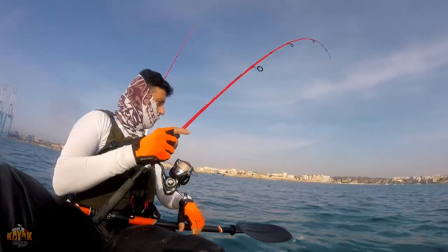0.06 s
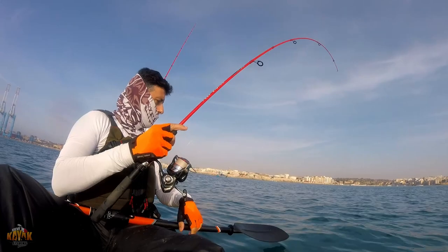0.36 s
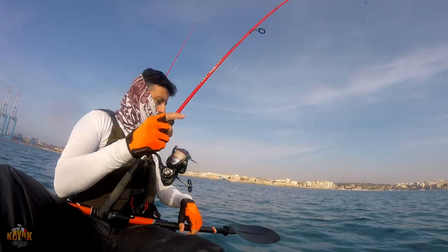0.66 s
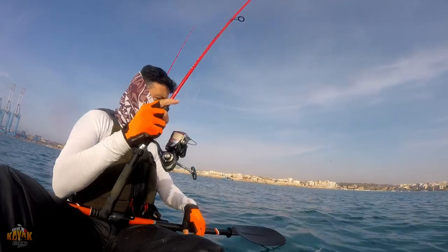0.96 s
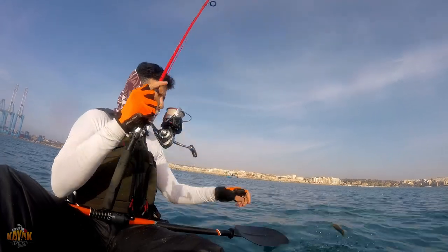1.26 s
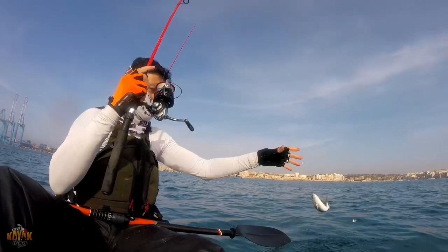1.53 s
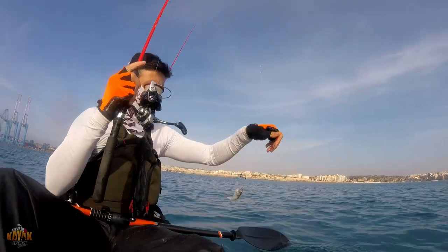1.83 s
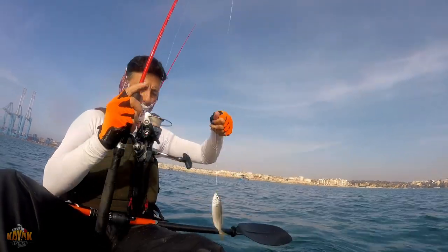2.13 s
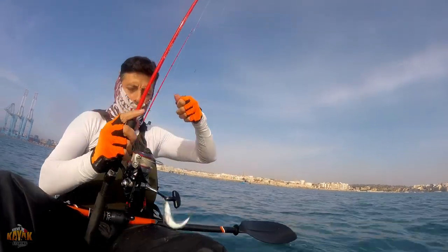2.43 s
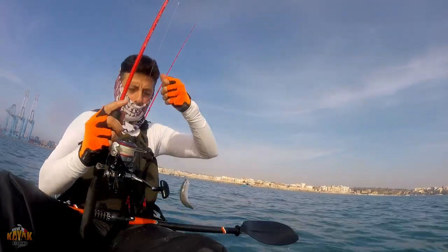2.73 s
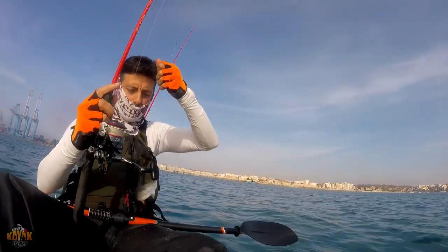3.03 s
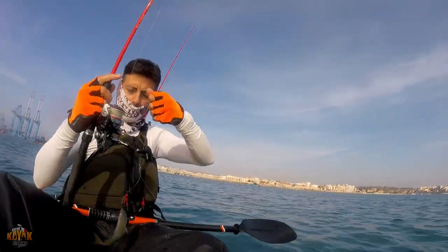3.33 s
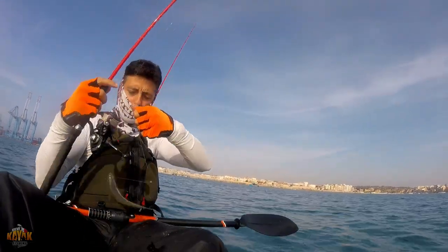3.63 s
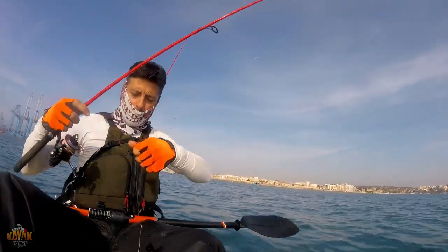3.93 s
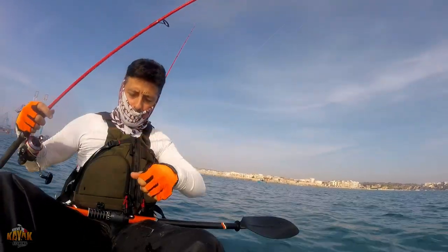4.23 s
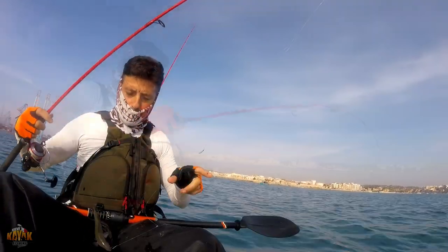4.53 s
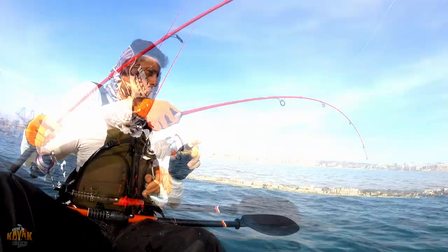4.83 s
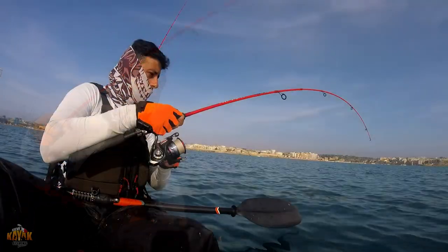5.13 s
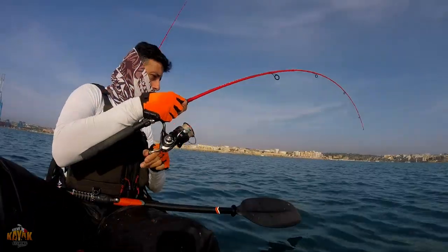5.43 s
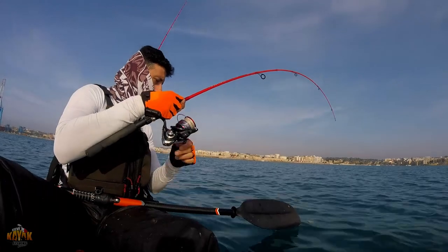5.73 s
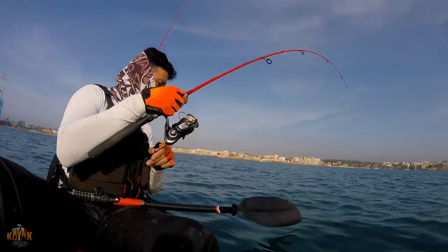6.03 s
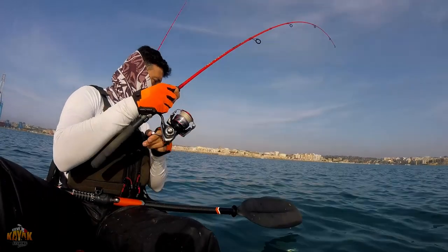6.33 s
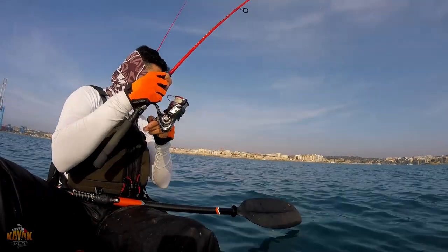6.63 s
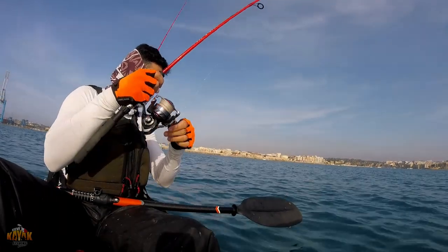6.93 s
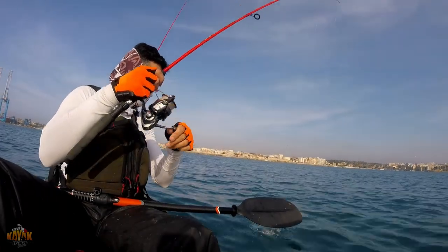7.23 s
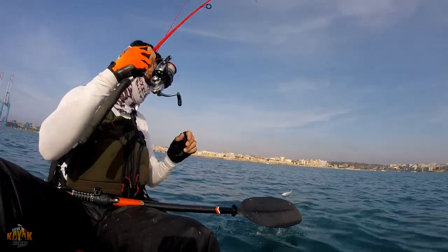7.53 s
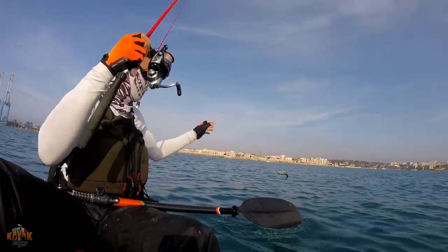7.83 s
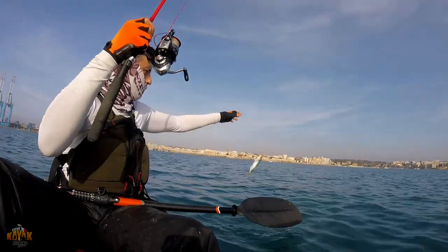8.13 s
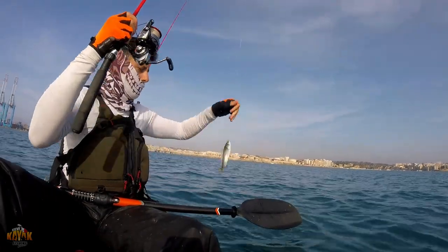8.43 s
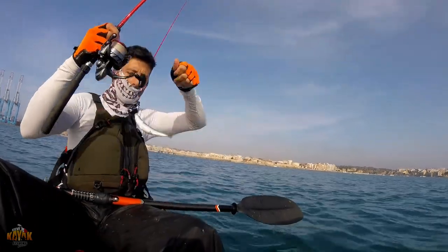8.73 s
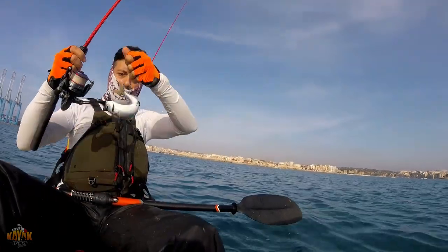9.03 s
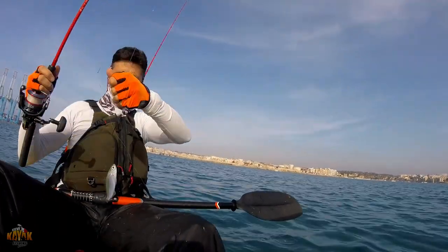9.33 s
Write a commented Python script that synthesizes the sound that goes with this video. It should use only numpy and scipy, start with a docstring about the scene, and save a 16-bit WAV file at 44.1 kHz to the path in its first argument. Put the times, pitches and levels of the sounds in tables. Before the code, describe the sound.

Wind buffets the microphone while small waves slap a hollow plastic kayak on open sea. A reel ticks faintly and a fish splashes lightly, then tackle clacks, clothing rustles and the rod butt and catch knock on the boat as gusts build. After a brief dropout, the wind fades and a second fish thrashes at the surface. The breeze returns under a last flurry of loud knocks and clacks. Everything is close, without echo.

```python
"""Fishing from a plastic kayak on open sea. Wind buffets the microphone, small waves slap the hollow
hull, the reel ticks and clothing rustles. A fish splashes as it is lifted out; tackle clacks, and the rod
butt and swinging catch knock on the boat while the breeze builds. Halfway, the sound drops out briefly.
The wind dies down as a second fish is reeled in and thrashes at the surface, then returns under a last
flurry of knocks and clacks."""
import sys
import numpy as np
from scipy import signal
from scipy.fft import rfft, irfft
from scipy.io import wavfile
from scipy.ndimage import uniform_filter1d

SR = 44100
rng = np.random.default_rng(int(sys.argv[2]) if len(sys.argv) > 2 else 0)


def inscribe(sig):
    """Save sig as 16-bit PCM at rate SR to the path in sys.argv[1].

    A 1-D sig is mono; a 2-D sig holds one channel per row.
    Samples are clipped to [-1, 1] before scaling.
    """
    pcm = np.round(np.clip(np.atleast_2d(sig).T, -1, 1) * 32767)
    wavfile.write(sys.argv[1], SR, pcm.astype(np.int16))


N = 421596
TIME = np.arange(N) / SR


def amp(db):
    """Decibels to gain."""
    return 10 ** (np.asarray(db) / 20)


def unit(x):
    """Scales to rms 1."""
    return x / np.sqrt(np.mean(x ** 2) + 1e-20)


def unit_peak(x, size=130):
    """Scales the loudest three milliseconds to rms 1."""
    return x / np.sqrt(uniform_filter1d(x ** 2, size).max() + 1e-20)


def add(mix, start_s, sound):
    """Mixes a sound in at a time."""
    part = mix[max(round(start_s * SR), 0):][:len(sound)]
    part += sound[:len(part)]


def colour(eq, hz):
    """Gain of a (freq_hz, gain_db) EQ curve at the given frequencies."""
    freq_hz, gain_db = np.transpose(eq)
    return amp(np.interp(np.log(hz + 1), np.log(freq_hz), gain_db))


def shape(x, eq, size=4096):
    """Minimum-phase EQ: a blow never sounds before it lands."""
    log_gain = np.log(colour(eq, abs(np.fft.fftfreq(size, 1 / SR))))
    response = np.fft.ifft(np.exp(np.conj(signal.hilbert(log_gain)))).real
    return signal.oaconvolve(x, response[:size // 2])[:len(x)]


def noise(eq, patchy_db, size=1024):
    """Coloured noise with drifting patches in time and frequency."""
    hz, hop = np.fft.rfftfreq(size, 1 / SR), size // 4
    real, imag, patches = rng.standard_normal((3, N // hop + 5, len(hz)))
    patches = unit(uniform_filter1d(uniform_filter1d(patches, size=7, axis=0), size=12, axis=1))
    spectrum = (real + 1j * imag) * colour(eq, hz) * amp(patchy_db * patches)
    return unit(signal.istft(spectrum.T, nperseg=size, noverlap=size - hop)[1][:N])


def burst(t, t60):
    """Noise that starts at once and dies away."""
    return rng.standard_normal(len(t)) * np.exp(-np.log(1000) * t / t60)


def attack(t, rise_s):
    """A quick fade-in that rounds off an onset."""
    return 1 - np.exp(-t / rise_s)


def ring(modes, t, scatter_db, detune):
    """Damped modes; the place of the blow changes their strength and pitch a little."""
    hz, db, t60 = np.transpose(modes)[:, :, None]
    strength, shift = rng.standard_normal((2, len(modes), 1))
    waves = np.sin(2 * np.pi * hz * (1 + detune * shift) * t) * np.exp(-np.log(1000) * t / t60)
    return (amp(db + scatter_db * strength) * waves).sum(0)


def curve(points):
    """Joins (time_s, value) points by straight lines over the whole scene."""
    return np.interp(TIME, *np.transpose(points))


def surges(events, rise_s, t60):
    """Envelope of (peak_s, level_db) events that each build up quickly and die away."""
    power = np.zeros(N)
    for peak_s, db in events:
        age = TIME - peak_s
        fade_in = np.clip(1 + age / rise_s, 0, 1)
        power += (amp(db - 60 * np.maximum(age, 0) / t60) * fade_in) ** 2
    return np.sqrt(power)


def scatter(spells, spread_db):
    """Turns spells into single (start_s, level_db) events, uneven in time and strength."""
    events = []
    for start_s, end_s, rate, db in spells:
        count = max(round((end_s - start_s) * rate), 1)
        times = start_s + (end_s - start_s) * (np.arange(count) + rng.random(count)) / count
        events += zip(times, db + spread_db * rng.standard_normal(count))
    return events


def wind_and_thump():
    """Eddies at the microphone rumble with breeze and gusts; the same rumble voices one closing thump."""
    # the breeze builds, dies down and returns: time_s, level_db
    breeze = [(0, -33), (.2, -33), (1.1, -35.5), (1.5, -31), (1.7, -24), (2.75, -26), (3.4, -17),
              (4.52, -15.5), (4.68, -37.5), (4.86, -29.5), (5.45, -25.5), (6.3, -29.5), (7.3, -44.5),
              (8.55, -57), (8.85, -37), (9.56, -28)]
    # gusts, then at 9.54 s the low thump of the catch hitting the hull: peak_s, level_db
    low_pulses = [(.64, -26), (1.28, -21), (1.57, -18), (1.82, -16.5), (1.96, -18), (2.21, -22),
                  (2.35, -14), (3.06, -10), (3.25, -9.5), (3.77, -11.5), (4.46, -10.5), (9.54, -19)]
    # bass-heavy rumble: freq_hz, gain_db
    rumble_eq = [(8, -26.5), (28, 2.5), (60, 7), (110, -1.5), (170, -8.5), (260, -22), (420, -39),
                 (1000, -59.5), (3000, -72)]
    spectrum = rfft(rng.standard_normal(N)) * colour(rumble_eq, np.fft.rfftfreq(N, 1 / SR))
    rumble = unit(irfft(spectrum, N))
    swell = np.sqrt(uniform_filter1d(rumble ** 2, size=4000) + 1e-9)
    strength = np.hypot(amp(curve(breeze)), surges(low_pulses, rise_s=0.026, t60=0.17))
    return strength * unit(rumble / swell)  # even out the noise so the envelope sets the level


def sea(wash_db=-46.5, wash_follow=0.56, typical_lap_db=-34):
    """Water murmurs under the hull; the wash of the open sea rises and falls with it."""
    # how hard the water works under the hull: time_s, level_db
    lap_levels = [(0, -29.5), (.8, -34.5), (1.4, -32.5), (2.1, -35.5), (3.1, -32.5), (3.8, -33), (4.5, -30),
                  (4.68, -45.5), (5.3, -40.5), (6.1, -35), (6.7, -36.5), (8.2, -35.5), (8.62, -28.5),
                  (8.85, -37.5), (9.3, -36), (9.56, -15.5)]
    # low, hollow lapping: freq_hz, gain_db
    lap_eq = [(40, -18.5), (102, -48), (138, -6), (190, 6.5), (240, -6), (305, -6.5), (400, -26.5),
              (700, -40), (2000, -65)]
    # broad wash of open water: freq_hz, gain_db
    wash_eq = [(100, 0.5), (300, 1), (600, 1), (900, -6.5), (1300, -8.5), (2400, -18), (4000, -25.5),
               (5500, -34.5), (7500, -25), (9800, -25.5), (11500, -36.5), (15000, -40.5)]
    lap_db = curve(lap_levels)
    lapping = amp(lap_db) * noise(lap_eq, patchy_db=1.5)
    wash = amp(wash_db + wash_follow * (lap_db - typical_lap_db)) * noise(wash_eq, patchy_db=2.5)
    return lapping + wash


def microphone_hiss(level_db=-70):
    """The microphone's own fine, steady noise floor."""
    # thin, airy hiss: freq_hz, gain_db
    hiss_eq = [(1000, -4.5), (4500, -6.5), (7500, 9.5), (9800, -4.5), (11500, -3), (15000, -2)]
    return amp(level_db) * noise(hiss_eq, patchy_db=-0.5)


def reel_ticks(trim_db=-6.0, ping_hz=2000, ping_t60=0.035, ping_db=-4):
    """Small clicks, each with a short ping, as the reel gives line under load."""
    # the sharpest ticks of reel and taut line: start_s, level_db
    accents = [(.3547, -37.5), (.6543, -38), (.7237, -37), (.7455, -36), (1.204, -34.5), (1.2333, -32.5),
               (1.3572, -32.5), (1.3962, -34.5), (1.5532, -33), (1.5733, -31), (1.6792, -31.5),
               (1.7602, -34.5), (1.7918, -34), (1.8737, -34.5), (2.0654, -36), (2.3361, -31),
               (6.1546, -39.5), (6.782, -42), (8.099, -34.5), (8.2028, -37), (8.3609, -38), (8.3865, -31.5),
               (9.059, -33), (9.2477, -32.5)]
    # spells of fine ticking: start_s, end_s, ticks_per_s, level_db
    ticking = [(0, .6, 23.4, -44.5), (.62, .83, 44, -42.5), (1.0, 1.86, 45, -42), (1.98, 2.33, 22, -40),
               (4.756, 5.448, 41, -53.5), (6.15, 6.848, 34, -53.5), (7.394, 8.052, 26.6, -46.5),
               (8.101, 8.48, 59, -41)]
    # bright click: freq_hz, gain_db
    click_eq = [(1200, -5.5), (1900, 6), (2500, 8.5), (4000, 1), (5200, 9.5), (6300, 3.5), (7500, -5.5),
                (11000, -14), (14000, -35)]
    out, t = np.zeros(N), np.arange(SR // 20) / SR
    onset = attack(t, rise_s=.001)
    for start_s, db in accents + scatter(ticking, spread_db=3.5):
        click = unit_peak(shape(burst(t, t60=.012) * onset, click_eq))
        ping = unit_peak(ring([(ping_hz, 0, ping_t60)], t, scatter_db=0, detune=.09) * onset)
        add(out, start_s, amp(db + trim_db) * (click + amp(ping_db) * rng.uniform(0, 1.45) * ping))
    return out


def hull_drumming(trim_db=-1.0, rise_s=0.01137):
    """The hull drums softly as wavelets swell against it, and once booms dully under a knock."""
    # wavelet slaps, and at 4.019 s the dull boom of the hull under a knock: start_s, level_db, pitch_hz
    thuds = [(0.17, -15.5, 287), (0.247, -19, 300), (0.288, -20, 288), (0.632, -20, 285), (1.22, -20, 194),
             (1.27, -25, 202), (1.316, -23, 195), (1.559, -9.5, 156.5), (1.564, -18, 291), (1.58, -21, 160),
             (2.988, -21, 300), (3.518, -24, 310), (4.019, -9.5, 273), (4.94, -22.5, 306),
             (6.561, -31, 172)]
    # dull drum tone: pitch_multiple, gain_db
    drum_eq = [(.25, -21), (.55, -1.5), (.78, -7.5), (1.0, 6), (1.15, -2), (1.4, -24.5), (2.4, -29.5),
               (7, -75)]
    out, t = np.zeros(N), np.arange(SR // 4) / SR
    for start_s, db, pitch_hz in thuds:
        push = rng.standard_normal(len(t)) * t / rise_s * np.exp(-t / rise_s)
        drum = shape(push, [(multiple * pitch_hz, gain_db) for multiple, gain_db in drum_eq])
        add(out, start_s - rise_s / 2, amp(db + trim_db) * unit_peak(drum))
    return out


def rustle(trim_db=-3.5, grain_db=-2, grains_per_s=500, attack_s=0.019, swell_db=3.5, release_s=0.071):
    """Line and clothing rub as the arms move: a hiss with tiny snags in it."""
    # arm strokes: start_s, length_s, level_db
    strokes = [(.2, 0.63, -59), (1.02, 0.33, -53.5), (1.45, 0.39, -56.5), (1.976, 0.19, -49),
               (2.231, 0.43, -50.5), (2.6, .42, -48.5), (2.943, 0.32, -45.5), (3.24, .2, -39.5),
               (3.446, 0.13, -42), (3.6, .12, -55), (3.768, 0.34, -44), (4.098, 0.32, -50),
               (7.14, 0.093, -51), (7.25, 0.385, -57.5), (8.08, 0.53, -56), (8.62, 0.23, -53),
               (8.852, 0.55, -54), (9.274, 0.31, -54)]
    # crisp friction: freq_hz, gain_db
    rub_eq = [(900, -12.5), (2000, -11.5), (3000, -4.5), (4100, -14.5), (5000, 1), (5600, 2), (6600, -10),
              (9700, -12), (11300, -56.5), (15000, -35)]
    strength = np.full(N, amp(-70))  # faint floor between strokes
    for start_s, length_s, db in strokes:
        age = TIME - start_s
        gate = np.clip(age / attack_s, 0, 1) * np.clip(1 - (age - length_s) / release_s, 0, 1)
        to_go = np.clip(1 - age / length_s, 0, 1)  # a stroke grows as the arm speeds up
        strength = np.maximum(strength, gate * amp(db - swell_db * to_go))
    snag_sizes = amp(5 * np.minimum(rng.exponential(1, N), 4)) * rng.choice([-1, 1], N)
    grains = unit(shape(snag_sizes * (rng.random(N) < grains_per_s / SR), rub_eq))
    hiss = noise(rub_eq, patchy_db=.6)
    return amp(trim_db) * strength * unit(hiss + amp(grain_db) * grains)


def bubble(hz, cycles, glide):
    """An air pocket rings and rises in pitch as it nears the surface."""
    age = np.arange(int(4 * cycles / hz * SR)) / SR * hz / cycles  # in decay times
    phase = 2 * np.pi * cycles * (age + glide * age ** 2 / 2)
    return np.sin(phase) * np.exp(-age) * (1 - np.exp(-10 * age))


def splashes(spray_db=-3.0, spatter_db=-3.5, bubble_db=-3.0, drops_per_s=110, births_per_s=12):
    """A thrashing fish throws spray, spattering drops and a cloud of small bubbles, with a few large."""
    # thrashes at the surface: peak_s, level_db
    thrashes = [(1.02, -46), (1.3, -52), (1.5, -48.5), (1.88, -45), (2.18, -46.5), (7.1, -44),
                (7.18, -36.5), (7.25, -37.5), (7.33, -44), (7.5, -48.5)]
    # drops falling back on the sea: freq_hz, gain_db
    spatter_eq = [(400, 12), (800, 2.5), (1800, 12), (4000, -12.5), (5500, 2), (8000, -10), (10000, -6),
                  (11500, -26)]
    # spray and its bubble cloud: freq_hz, gain_db
    spray_eq = [(350, -20), (650, 4), (900, -1), (1250, 4), (1600, -5), (2000, -15), (3000, -10.5),
                (4200, -8.5), (7000, -6), (9800, -38), (11500, -46)]
    # single large bubbles: start_s, pitch_hz, level_db, decay_cycles
    large_bubbles = [(0.523, 975, -44.5, 24), (1.305, 955, -46, 22), (1.875, 960, -33, 10.5),
                     (2.111, 2430, -40.5, 14), (4.801, 2200, -50, 11), (7.105, 2180, -39, 13),
                     (7.18, 1210, -36, 7.9), (7.262, 1270, -28, 7), (7.267, 1790, -35, 8),
                     (7.283, 810, -38, 5.5), (7.309, 1130, -31, 8.5), (7.335, 653, -28.5, 4),
                     (7.338, 1165, -29, 6), (7.362, 1180, -34.5, 9.1)]
    drops = (rng.random(N) < drops_per_s / SR) * rng.uniform(-1, 1, N)
    impacts = signal.oaconvolve(drops, burst(TIME[:400], t60=.008))[:N]
    spatter = unit(shape(impacts, spatter_eq))
    cloud, plops = np.zeros(N), np.zeros(N)
    for hz in np.geomspace(600, 8000, 30):  # one stream of births for each bubble size
        births = (rng.random(N) < births_per_s / SR) * rng.uniform(.2, 1, N)
        fizz = signal.oaconvolve(births, bubble(hz, cycles=7, glide=.05))[:N]
        cloud += colour(spray_eq, hz) * np.sqrt(hz) * fizz
    for start_s, hz, db, cycles in large_bubbles:
        add(plops, start_s, amp(db + bubble_db) * unit_peak(bubble(hz, cycles, glide=.008 * cycles)))
    spray = .35 * noise(spray_eq, patchy_db=2) + unit(cloud)
    strength = surges(thrashes, rise_s=0.023, t60=0.6)
    return plops + strength * (amp(spray_db) * spray + amp(spatter_db) * spatter)


def tackle_clacks(snap_db=7, tail_db=-24, loose_t60=0.057):
    """Hard tackle strikes rod and reel: a sharp snap, a short bright ring and a faint rattle."""
    # distinct strikes: start_s, level_db, t60_s
    strikes = [(2.4035, -17.5, 0.019), (2.4615, -27.5, 0.03), (2.525, -16.5, 0.011), (2.5794, -16.5, 0.016),
               (3.1466, -26.5, .012), (3.3275, -25, 0.025), (3.419, -25.5, 0.067), (3.7604, -29, 0.039),
               (3.8016, -29, 0.041), (3.8457, -17.5, 0.014), (3.922, -21, 0.032), (3.9344, -30, 0.022),
               (4.0193, -32, 0.047), (4.0457, -21, 0.025), (4.2496, -29, 0.053), (4.3775, -27, 0.041),
               (4.398, -25, 0.076), (4.4108, -28, 0.031), (4.5092, -39, 0.057), (8.5886, -21, 0.023),
               (8.6373, -25, 0.018), (9.2965, -25, 0.04), (9.384, -17.5, .019), (9.403, -23, .025),
               (9.4098, -19, 0.03), (9.477, -38, 0.017), (9.5105, -22, .025), (9.5245, -11, 0.028),
               (9.5399, -20, .029), (9.5554, -20, .033)]
    # spells of loose tackle rattling: start_s, end_s, clacks_per_s, level_db
    rattling = [(3.78, 3.86, 40, -30.5), (3.97, 4.13, 40, -34), (4.13, 4.28, 25, -41),
                (9.35, 9.51, 25, -38.5)]
    # hard, bright contact: freq_hz, gain_db
    clack_eq = [(400, 8), (1200, -6.5), (2700, -1), (4000, -6), (5300, 5), (6700, -3), (8000, -5),
                (9800, -6), (11200, -29), (15000, -35.5)]
    out, t = np.zeros(N), np.arange(SR // 8) / SR
    loose = [(start_s, db, loose_t60) for start_s, db in scatter(rattling, spread_db=2.0)]
    for start_s, db, t60 in strikes + loose:
        contact = amp(snap_db) * burst(t, t60=0.01) + burst(t, t60) + amp(tail_db) * burst(t, t60=0.098)
        clack = shape(contact * attack(t, rise_s=0.00056), clack_eq)
        add(out, start_s, amp(db) * unit_peak(clack))
    return out


def hull_knocks(crack_db=-3.0, skin_db=-8.5, rattle_db=-21, bump_boom_db=3.5, bump_tilt=-7):
    """Each blow cracks and rings on the plastic skin, then the hollow hull booms."""
    # rod butt and catch hitting the boat: start_s, level_db, boom_db, tilt_db_per_octave
    blows = [(2.484, -23.5, -19, -1), (2.49, -17.5, -11, -0.5), (2.741, -16.5, -12, -2),
             (2.831, -9.5, -9.5, -8.5), (2.849, -13.5, -6, -0.5), (2.876, -17.5, -16, -3),
             (2.911, -26, -15.5, -2), (2.938, -21.5, -14.5, -6), (3.066, -25, -22, -8.5),
             (3.168, -24, -15.5, -11), (3.228, -22.5, -21, -8), (3.8, -21, -47, 8),
             (3.846, -21.5, -42, 5.5), (4.016, -26, -20.5, -3), (4.376, -19.5, -12, 2.5),
             (8.589, -5.5, -17.5, .5), (8.5935, -9.5, -3, -1.5), (8.638, -32.5, -10, 6),
             (8.841, -12, -7.5, -1), (8.867, -15, -8, 0), (8.995, -27, -23.5, -7.5),
             (9.125, -31.5, -25.5, -11), (9.207, -32.5, -30, 5.5), (9.297, -23, -23, -9),
             (9.354, -10, -38, -2), (9.361, -14, -8, -10), (9.379, -20, -17, 4), (9.402, -16, -14, -4),
             (9.421, -15, -11.5, -11.5), (9.445, -22, -22, -2), (9.51, -16, -24, 1), (9.524, -10, -7, 2.5),
             (9.54, -24, -8, 1), (9.552, -28, -3.5, -1)]
    # light bumps of the swinging catch: start_s, end_s, bumps_per_s, level_db
    bumping = [(2.96, 3.32, 20, -27.5), (4.08, 4.17, 20, -29.5)]
    # crack of the contact: freq_hz, gain_db
    crack_eq = [(150, -13.5), (400, -2.5), (650, 4), (1000, -4), (1600, 0), (2200, -10), (2800, -11.5),
                (4000, -27.5), (5400, -22), (7000, -29), (12000, -61)]
    # modes of the plastic skin: pitch_hz, level_db, t60_s
    skin_modes = [(454.5, 1.5, 0.086), (634, -3, 0.12), (680, -5.5, 0.19), (803, -1.5, 0.11),
                  (947, 12.5, 0.027), (1038, -3.5, 0.071), (1201, 4, 0.046), (1530, 0, 0.024),
                  (1788, -1.5, 0.025), (2150, -9.5, 0.047), (2290, -18, 0.035), (2720, -30.5, 0.038)]
    # modes of the hollow hull: pitch_hz, level_db, t60_s
    hull_modes = [(141, -40, 0.23), (181, -12, 0.37), (209, -25, 0.47), (242.8, 2, 0.09), (292, 1.5, 0.18),
                  (306, -5, 0.23), (322.5, -1.5, 0.15), (367, -6.5, 0.073)]
    out, t = np.zeros(N), np.arange(SR // 3) / SR
    bumps = [(start_s, db, db + bump_boom_db, bump_tilt) for start_s, db in scatter(bumping, 0.5)]
    for start_s, db, boom_db, tilt in blows + bumps:
        # a harder contact is brighter: the tone tilts about 1 kHz
        tilted_eq = [(hz, gain_db + tilt * np.log2(hz / 1000)) for hz, gain_db in crack_eq]
        modes = [(hz, mode_db + tilt * np.log2(hz / 1000), t60) for hz, mode_db, t60 in skin_modes]
        crack = shape(burst(t, t60=0.021) + amp(rattle_db) * burst(t, t60=0.067), tilted_eq)
        skin = ring(modes, t, scatter_db=3, detune=.03) * attack(t, rise_s=.002)
        boom = ring(hull_modes, t, scatter_db=1.0, detune=.008) * attack(t, rise_s=.004)
        impact = amp(crack_db) * unit_peak(crack) + amp(skin_db) * unit_peak(skin)
        add(out, start_s, amp(db) * impact + amp(boom_db) * unit_peak(boom))
    return out


def hull_cavity(blows, echo_db=-21, t60=0.3):
    """The air space inside the hull adds a faint diffuse echo to each blow."""
    # tone of the echo: freq_hz, gain_db
    echo_eq = [(350, -23.5), (700, -7), (1500, -4.5), (2700, -1.5), (3800, -4), (9000, -31)]
    tail = shape(burst(TIME[:SR // 2], t60), echo_eq)
    return blows + amp(echo_db) * signal.oaconvolve(blows, tail / np.linalg.norm(tail))[:N]


def tackle_scrape(start_s=4.388, length_s=0.026, level_db=-28, slips_per_s=700):
    """Tackle drags briefly on the boat: rapid slips ring a few short modes."""
    # modes rung by the slips: pitch_hz, level_db, t60_s
    modes = [(2870, -2.5, 0.023), (4230, -9.5, 0.0091), (5560, 3.5, 0.0084)]
    out, t = np.zeros(N), np.arange(round(length_s * SR)) / SR
    slips = (rng.random(len(t)) < slips_per_s / SR) * rng.uniform(0.18, 1, len(t))
    drag = slips * signal.windows.tukey(len(t))
    body = ring(modes, t, scatter_db=3.5, detune=0)
    add(out, start_s, amp(level_db) * unit_peak(signal.oaconvolve(drag, body)))
    return out


def scene():
    """A mono mix: everything is close to the microphone, and open water gives no echo."""
    afloat = sea() + hull_drumming() + splashes()
    handling = hull_cavity(hull_knocks()) + tackle_clacks() + reel_ticks() + tackle_scrape() + rustle()
    hiss = microphone_hiss()
    return (wind_and_thump() + afloat + handling + hiss)[None]


def record(dry, mute_s=4.53, resume_s=4.63, ceiling=.95, cutoff_hz=15300):
    """A brief silence with a fade back in, clipping on the hardest blows, and a treble cut."""
    gate = np.interp(TIME, [mute_s - .004, mute_s + .004, resume_s, resume_s + .04], [1, 0, 0, 1])
    clipped = np.clip(dry * gate, -ceiling, ceiling)
    lowpass = signal.firwin(255, cutoff_hz, window=("kaiser", 9), fs=SR)
    return signal.oaconvolve(clipped, lowpass[None], "same")


dry = scene()
out = record(dry)
inscribe(out)
```